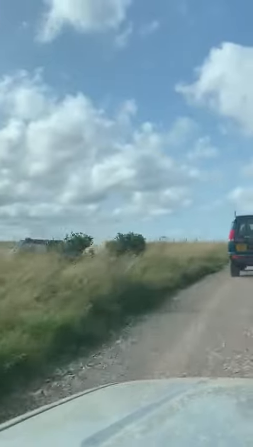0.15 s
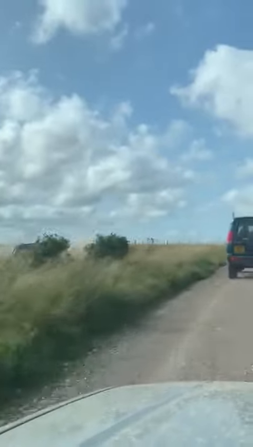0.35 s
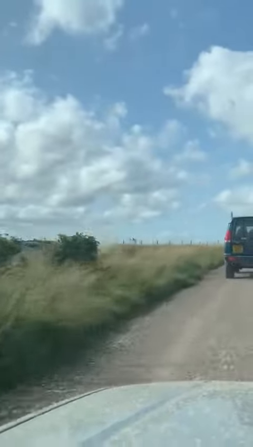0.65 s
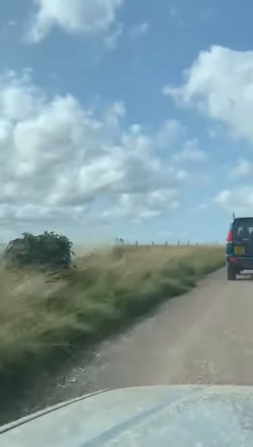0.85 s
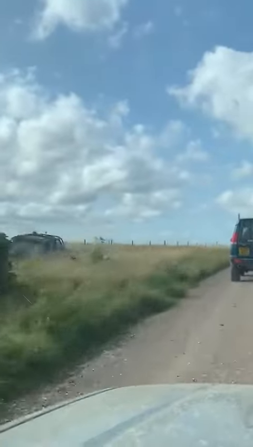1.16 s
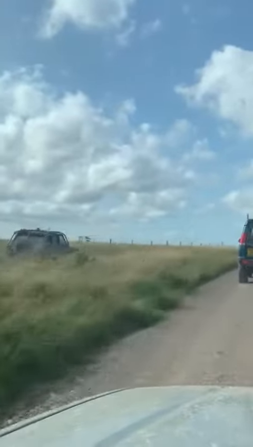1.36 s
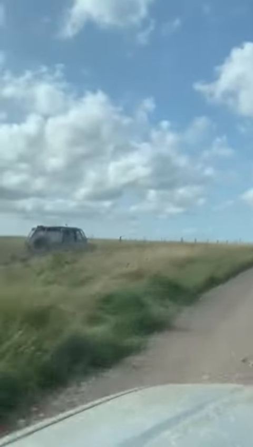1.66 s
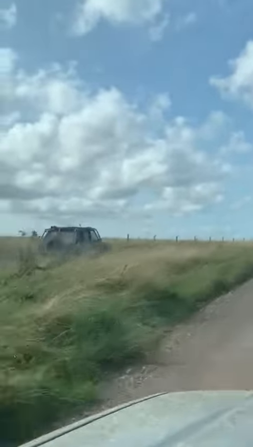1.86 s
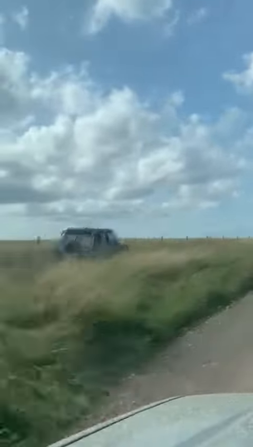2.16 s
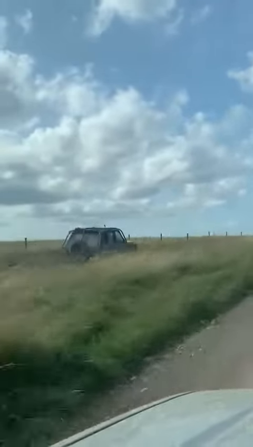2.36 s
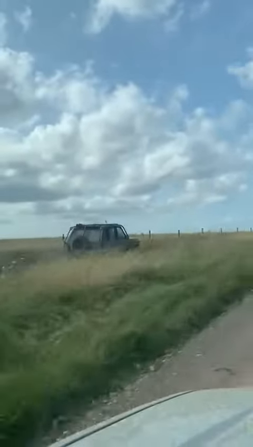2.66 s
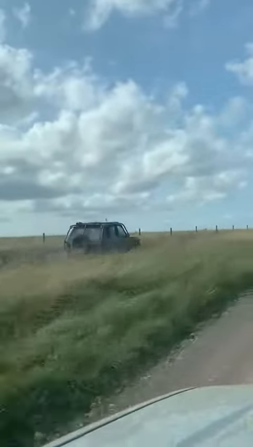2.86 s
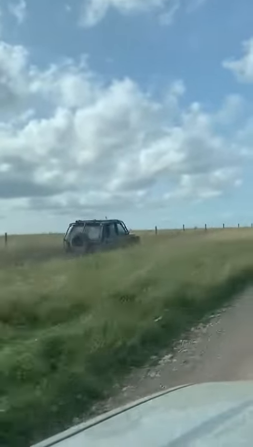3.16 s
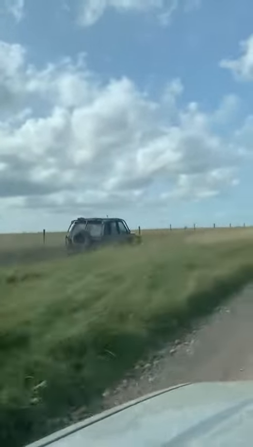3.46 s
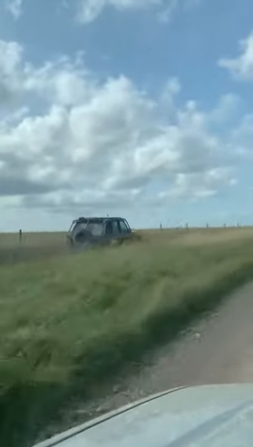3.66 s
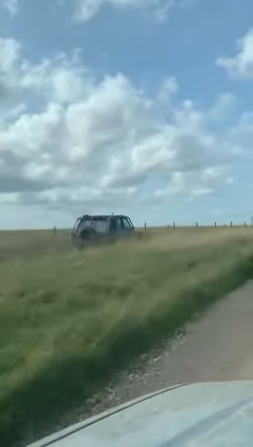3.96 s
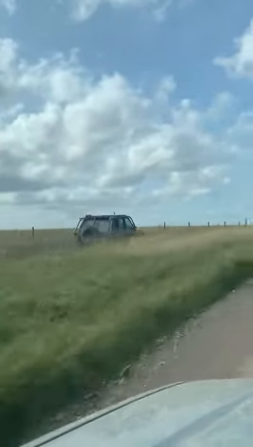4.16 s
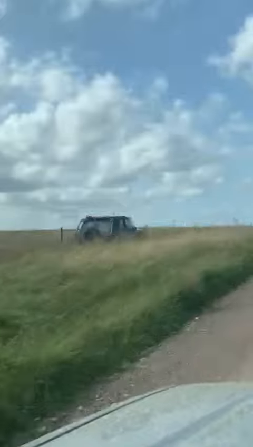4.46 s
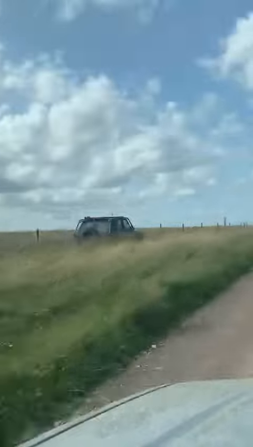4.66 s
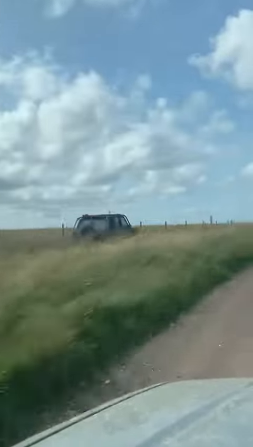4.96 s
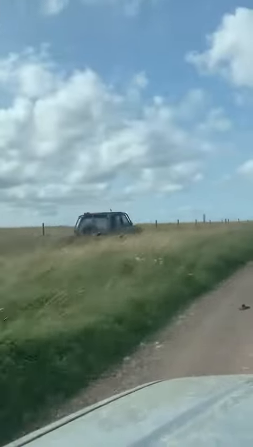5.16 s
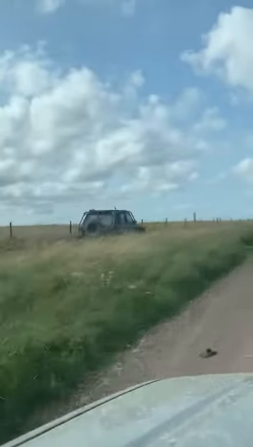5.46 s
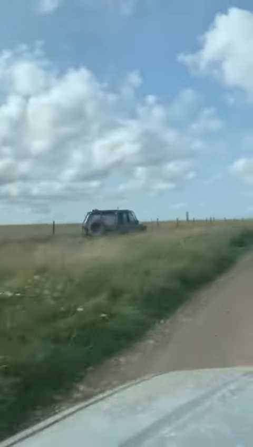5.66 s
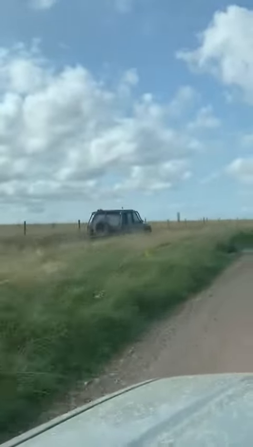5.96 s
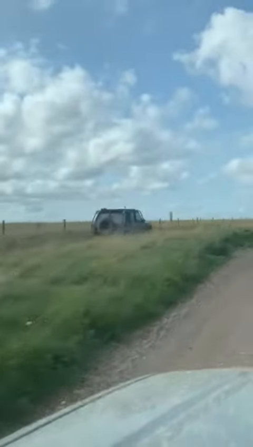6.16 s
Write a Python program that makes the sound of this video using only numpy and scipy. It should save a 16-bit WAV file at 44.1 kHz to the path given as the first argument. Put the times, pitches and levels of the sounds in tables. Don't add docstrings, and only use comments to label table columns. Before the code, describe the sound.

Heavy low wind boom fills a moving vehicle cabin, with gravel hiss, stone hits, rattles, a short engine surge, then a steady driveline hum.

```python
import sys
import numpy as np
from scipy import signal
from scipy.fft import rfft, irfft, next_fast_len
from scipy.io import wavfile
from scipy.ndimage import uniform_filter1d, minimum_filter1d

SR = 44100
rng = np.random.default_rng(int(sys.argv[2]) if len(sys.argv) > 2 else 0)


def convert_level_to_amplitude(level_db):
    exponent = np.asarray(level_db, float) / 20
    return 10 ** exponent


def unload_wav(signal):
    wavfile.write(
        sys.argv[1],
        SR,
        np.round(np.clip(np.atleast_2d(signal).T, -1, 1) * 32767).astype(np.int16),
    )


N = 278712
T = np.arange(N) / SR
BURST_T = np.arange(SR // 8) / SR


def in_time(rows):
    s, *columns = np.transpose(rows)
    return [np.interp(T, s, c) for c in columns]


def at_hz(points, hz):
    table_hz, values = np.transpose(points)
    return np.interp(np.log(hz + 1), np.log(table_hz), values)


def rms_one(x):
    return x / np.sqrt(np.mean(x ** 2) + 1e-20)


def drift(rate):
    r = np.exp(-80 * np.pi * rate / SR)
    slow = signal.lfilter([1], [1, -2 * r, r * r], rng.standard_normal(N // 40 + 2002))[2000:]
    return np.interp(np.arange(N) / 40, np.arange(len(slow)), rms_one(slow))


def resonance(x, hz, width_hz):
    r = np.exp(-np.pi * width_hz / SR)
    zeros = np.array([1, 0, -1]) * (1 - r * r) / 2
    return signal.lfilter(zeros, [1, -2 * r * np.cos(2 * np.pi * hz / SR), r * r], x + 1e-18)


def turbulence(spectrum, shared_db, own_db, rate, count):
    size = next_fast_len(N)
    hz = np.fft.rfftfreq(size, 1 / SR)
    low_hz, high_hz = spectrum[0][0], spectrum[-1][0]
    inside = (hz > low_hz) & (hz < high_hz)
    colour = rfft(rng.standard_normal(size)) * convert_level_to_amplitude(at_hz(spectrum, hz)) * inside
    place = np.interp(np.log(hz + 1), np.log([low_hz, high_hz]), [0, count - 1])
    together = shared_db * drift(rate)
    total = np.zeros(N)
    for k in range(count):
        band = irfft(colour * np.clip(1 - abs(place - k), 0, 1), size)[:N]
        total += band * convert_level_to_amplitude(together + own_db * drift(rate))
    return rms_one(total)


def evened(x, hold_s, share):
    hold = int(hold_s * SR)
    level = uniform_filter1d(uniform_filter1d(x ** 2, hold), hold)
    return rms_one(x / (level + 1e-3) ** (share / 2))


def bumps(s, height, half_s, clock):
    return sum(d * np.clip(1 - abs(clock - at) / max(h, .01), 0, 1) for at, d, h in zip(s, height, half_s))


def bursts(times, peaks_db, lengths_s, rise_s, squareness):
    for s, db, length in zip(times, peaks_db, lengths_s):
        fall = np.exp(-(BURST_T / length) ** squareness)
        yield round(s * SR), convert_level_to_amplitude(db) * np.minimum(BURST_T / rise_s, 1) * fall


def burst_noise():
    return rng.standard_normal(SR // 8)


def add(out, at, sound):
    out[at:at + len(sound)] += sound[:N - at]


# f/Hz, level/dB (per Hz)
BOOM_COLOUR = [(45, -19), (54, -9.5), (59.5, -6), (63, -9), (66.5, -6.5), (73, -7.5), (88, -15.5),
               (100, -31)]
# t/s, f/Hz
BOOM_PITCH = [(0, 60.7), (.58, 62.06), (.74, 68.17), (1.23, 69.83), (1.62, 68.3), (1.76, 61.33),
              (2.02, 60.54), (2.11, 66), (2.83, 63.54), (3.2, 61.17), (3.7, 60.93), (4.25, 59.8),
              (4.6, 60.8), (5.0, 63.45), (5.25, 59.5), (5.8, 60), (6.32, 58.3)]
# t/s, shift/Hz, half length/s
BENDS = [
    (2.48, 7, .06),
    (2.966, -7, 0.097),
    (3.471, 10.5, 0.13),
    (3.896, 8, .14),
    (4.124, -6, 0.091),
    (4.779, 14, .14),
    (6.022, 9.5, 0.078),
]
# t/s, level/dB, half length/s
SURGES = [(0.027, 6, 0.066), (0.13, 0, 0.043), (0.552, 3.5, 0.12), (0.767, -6.5, 0.08), (.9, -3, .06),
          (1.15, -1.5, 0.089), (1.45, 4.5, 0.12), (1.77, -8, 0.088), (2.087, -6.5, 0.047), (2.13, 7, 0.034),
          (2.213, -15, 0.013), (2.306, -3, 0.045), (2.422, -0.5, 0.062), (2.6, -5, 0.024),
          (2.695, 6.5, 0.053), (2.724, -18, 0.02), (2.81, 1, 0.026), (2.923, -18, 0.025),
          (3.04, -15.5, 0.052), (3.13, 3, 0.045), (3.244, 5.5, 0.11), (3.367, -1.5, 0.1),
          (3.54, 3.5, 0.078), (3.671, -10, 0.055), (3.824, 0.5, 0.089), (3.878, -1.5, 0.037),
          (3.892, -0.5, 0.052), (4.059, -7.5, 0.11), (4.19, 7, 0.12), (4.45, -1.5, .1), (4.7, -0.5, 0.09),
          (4.911, -4.5, 0.081), (5.109, -7.5, 0.11), (5.302, -2, 0.094), (5.542, -2, 0.061),
          (5.798, -3.5, 0.11), (6.044, 5.5, 0.13), (6.096, -14, 0.054), (6.214, -19, 0.032)]
# t/s, flow level/dB, turbulence level/dB
AIRFLOW = [(0, -11.5, 0.5), (.45, -9, 1.5), (.8, -10.5, 2), (1.3, -11.5, 1), (1.65, -11.5, 2.5),
           (2.1, -9.5, -2.5), (2.5, -13.5, -3), (3.0, -12, 0.5), (3.5, -12, -2.5), (4.0, -10, 0),
           (4.4, -12.5, -0.5), (4.9, -12, -2), (5.4, -9.5, -1.5), (5.8, -14, -0.5), (6.1, -13.5, 1),
           (6.32, -14.5, 0)]


def cabin_boom():
    boom = evened(turbulence(BOOM_COLOUR, 0.024, 0.36, rate=5.5, count=2), hold_s=0.054, share=0.78)
    pitch_hz = in_time(BOOM_PITCH)[0] + bumps(*np.transpose(BENDS), T)
    clock = np.cumsum(pitch_hz / 63) % (N - 1)
    boom = np.interp(clock, np.arange(N), boom)
    locked = np.sin(2 * np.pi * np.cumsum(pitch_hz * (1 + 0.015 * drift(2.77))) / SR)
    level_db = in_time(AIRFLOW)[0] + bumps(*np.transpose(SURGES), T)
    return convert_level_to_amplitude(level_db - 2.0) * rms_one(boom + 1.25 * locked)


# f/Hz, level/dB (per Hz)
RUMBLE_COLOUR = [(20, -22.5), (31, -7.5), (42, -3.5), (52, 0), (62, -8)]


def body_rumble():
    rumble = evened(turbulence(RUMBLE_COLOUR, 0.52, 0.18, rate=0.79, count=2), hold_s=0.43, share=0.27)
    return convert_level_to_amplitude(in_time(AIRFLOW)[0] - 8.5) * rumble


# f/Hz, level/dB (per Hz)
THROB_COLOUR = [(75, -8.5), (92, 1), (108, -2), (125, 2), (155, -6.5), (200, -3.5), (260, -11), (330, -13),
                (420, -44)]
# t/s, level/dB, half length/s, size (0 small - 1 large)
EDDIES = [(0, 4.5, 0.03, 0.096), (0.101, 8, 0.026, 0.15), (0.32, 2, 0.09, 0.16), (0.622, -1.5, 0.019, 0.1),
          (1.05, 0.5, 0.13, 0.61), (1.195, -1.5, 0.042, 1), (1.387, 2.5, 0.15, 0.53),
          (1.603, 3, 0.024, 0.081), (2.1, 0, 0.03, 0.18), (2.344, 1, 0.16, .05), (2.612, 1.5, 0.16, 0.61),
          (2.696, 1, 0.14, 0.26), (2.781, 2, 0.073, 0.49), (3.033, -0.5, 0.17, 0.59),
          (3.153, 1, 0.043, 0.95), (3.183, 1.5, 0.034, 0.62), (3.522, 2.5, 0.13, 0.28),
          (3.701, 5, 0.1, 0.66), (3.858, 6.5, 0.046, 0.43), (4.02, 0.5, 0.11, 0.99),
          (4.138, 4, 0.032, 0.21), (4.517, 0, 0.1, 0.84), (4.692, 4, 0.18, 0.4),
          (4.819, -0.5, 0.045, 0.044), (4.977, 5, 0.12, 0.48), (5.096, -0.5, 0.14, 0.23),
          (5.5, -2, 0.093, 0.98), (5.697, 1, 0.057, 0.8), (5.79, -1, 0.12, 0.54),
          (6.223, -2.5, 0.074, 0.46)]


def wind_throb():
    throb = evened(turbulence(THROB_COLOUR, 0.57, 0.95, rate=8.1, count=5), hold_s=0.089, share=0.6)
    s, db, half_s, size = np.transpose(EDDIES)
    last_end = PULLS[-1][1]
    pulling = np.interp(T, [PULLS[0][0], PULLS[1][0], last_end, last_end + 0.12], [0, 1, 1, 0.76])
    level_db = -17.5 + 0.42 * in_time(AIRFLOW)[1] - 3 * pulling
    return convert_level_to_amplitude(level_db + bumps(s, 2 * db * size, half_s, T)) * throb


# f/Hz, level/dB (per Hz)
BUFFET_COLOUR = [(280, -7.5), (370, 0.5), (460, 1.5), (560, -5), (800, -7), (1150, -12), (1500, -19),
                 (2000, -22), (2800, -25.5)]


def wind_buffeting():
    rough_db = in_time(AIRFLOW)[1]
    buffet = evened(turbulence(BUFFET_COLOUR, 0.47, 2.81, rate=11.9, count=7), hold_s=0.15, share=0.74)
    edge = signal.sosfilt(signal.butter(2, 1400, "high", fs=SR, output="sos"), buffet)
    buffet = buffet + convert_level_to_amplitude(-6 + 2.5 * rough_db) * edge
    s, db, half_s, size = np.transpose(EDDIES)
    return convert_level_to_amplitude(-31 + 1.24 * rough_db + bumps(s, 2 * db * (1 - size), half_s, T)) * buffet


# f/Hz, level/dB (per Hz)
HISS_COLOUR = [(1500, -5.5), (2300, 1.5), (3300, 6.5), (4700, 2.5), (6300, -1.5), (8500, -4.5),
               (11500, -10.5), (11850, -13.5)]
# t/s, level/dB
TYRES = [(0, -62.5), (.1, -63.5), (.25, -63.5), (1.2, -65.5), (1.5, -60), (1.79, -64), (2.2, -66),
         (2.5, -65.5), (2.8, -64.5), (3.05, -67), (3.22, -66.5), (4.07, -66), (4.17, -68), (6.32, -69.5)]


def tyre_hiss():
    hiss = turbulence(HISS_COLOUR, 0.7, 1.6, rate=16.0, count=8)
    grains = rng.random(N) < 60 / SR
    grit = grains * convert_level_to_amplitude(4.0 * np.minimum(rng.exponential(1, N), 2))
    crackle = 1 + 0.73 * signal.lfilter([1], [1, -.985], grit)
    return convert_level_to_amplitude(in_time(TYRES)[0] + 18.5) * hiss * rms_one(crackle)


# t/s, peak level/dB, f/Hz
TICKS = [(0.058, -31.5, 6364), (0.395, -26, 3010), (0.4823, -46, 6400), (0.5863, -40.5, 6500),
         (0.835, -31.5, 6390), (.915, -35.5, 3180), (0.9668, -37.5, 6500), (1.052, -43, 6600),
         (1.2824, -41, 6400), (1.515, -35, 6300), (1.571, -37, 6400), (2.396, -36, 5600),
         (2.468, -39, 5840), (2.502, -44, 6560), (2.538, -42, 7160), (2.722, -34, 5560),
         (2.732, -31.5, 5600), (2.99, -34.5, 6000), (3.079, -39, 5500), (3.175, -40, 6060),
         (3.653, -43, 6058), (3.681, -35, 6050), (3.739, -39, 6200), (3.847, -53, 5930), (3.909, -35, 6020),
         (3.938, -41, 6600), (3.966, -40, 6572), (4.022, -44, 6390), (4.313, -46, 6980), (4.639, -44, 6400),
         (4.76, -48.5, 6700), (5.323, -44, 6510), (5.646, -44, 6290), (5.782, -53, 6280),
         (5.865, -50, 5996)]


def trim_ticks():
    out = np.zeros(N)
    s, db, tick_hz = np.transpose(TICKS)
    for hz, (at, shape) in zip(tick_hz, bursts(s, db, [.004] * len(s), 0.00074, 0.41)):
        ring = resonance(resonance(shape * burst_noise(), hz, 430), hz, 1300)
        add(out, at, convert_level_to_amplitude(17.0) * ring)
    return out


# t/s, peak level/dB, f/Hz
KNOCKS = [(0.085, -12, 407), (0.228, -15.5, 470), (0.258, -7, 406), (.307, -11, 378), (0.596, -9, 416),
          (0.637, -7.5, 472), (.701, -8.5, 418), (0.759, -7, 353), (.931, -10, 358), (1.085, -9.5, 743.6),
          (1.326, -16, 455), (1.39, -11.5, 376), (1.655, -26, 1290), (2.028, -15, 364), (2.101, -18.5, 350),
          (2.222, -24, 467), (2.589, -16, 362), (2.698, -17, 685), (3.324, -26.5, 560),
          (3.591, -19.5, 397.4), (3.846, -14.5, 486), (3.918, -16, 590), (4.114, -17.5, 450),
          (4.349, -14.5, 380), (4.688, -13, 521), (4.831, -23.5, 470), (4.959, -15.5, 434),
          (5.391, -12, 370), (5.99, -15, 470), (6.103, -16, 724.4), (6.185, -16, 495)]


def panel_knocks():
    out = np.zeros(N)
    s, db, panel_hz = np.transpose(KNOCKS)
    for hz, (at, shape) in zip(panel_hz, bursts(s, db - 15.5, [.02] * len(s), .0015, 0.81)):
        noise = burst_noise()
        tone = np.sin(2 * np.pi * hz * BURST_T)
        rough = rms_one(resonance(resonance(noise, hz, 0.5 * hz), 1.5 * hz, 1100))
        crack = rms_one(resonance(resonance(noise[::-1], 900, 980), 980, 1800)) * np.exp(-BURST_T / .005)
        add(out, at, shape * (1.88 * tone + 0.99 * rough + 0.58 * crack))
    return out


# t/s, peak level/dB, length/s, dulling/(dB per octave), lowest f/Hz
STONES = [(0.095, -24, 0.01, -7.5, 890), (0.141, -29, 0.017, -1.5, 3960), (0.231, -27, 0.016, -11.5, 910),
          (0.391, -17.5, 0.024, -6.5, 2700), (1.455, -29.5, 0.0098, -4, 1540),
          (1.6504, -23, 0.022, -2.5, 2530), (1.655, -14.5, 0.02, -9, 693), (1.673, -33.5, 0.053, -6, 2972),
          (2.1, -20, 0.0069, -19, 2220), (2.42, -45, 0.0059, -23, 902.4), (2.497, -24.5, 0.012, -12, 2220),
          (2.781, -20, 0.012, -9, 3400), (3.403, -32.5, 0.029, -7.5, 2000), (3.852, -28, 0.008, -22, 899),
          (4.686, -28.5, 0.026, -12, 900), (4.803, -37, 0.012, -4, 4000), (4.953, -37.5, 0.028, -9, 897)]


def stone_sprays():
    out = np.zeros(N)
    s, db, length_s, dulling_db, low_hz = np.transpose(STONES)
    hz = np.fft.rfftfreq(SR // 8, 1 / SR)
    for k, (at, shape) in enumerate(bursts(s, db - 4, np.clip(length_s, .003, .05), .0006, 2.5)):
        tilt = convert_level_to_amplitude(dulling_db[k] * np.log2(hz / 4000 + 0.29))
        tilt = tilt / (1 + (low_hz[k] / (hz + 1)) ** 8)
        add(out, at, shape * irfft(rfft(burst_noise()) * tilt, SR // 8))
    return out


# t/s, peak level/dB
SQUEAKS = [(0.14, -30), (0.688, -38), (0.823, -48), (0.99, -38), (1.087, -33), (1.144, -34), (1.324, -27.5),
           (1.589, -49), (4.831, -45), (5.503, -33.5), (5.555, -37), (5.615, -40), (6.15, -39)]


def trim_squeaks():
    out = np.zeros(N)
    for at, shape in bursts(*np.transpose(SQUEAKS), [.011] * len(SQUEAKS), 0.00027, 1.0):
        hz = 4720 + 30 * rng.standard_normal()
        add(out, at, shape * np.sin(2 * np.pi * hz * BURST_T))
    return out


# t/s, level/dB, half length/s
FITS = [(0.75, 5, 0.083), (1.18, 15, 0.06), (2.308, 10.5, 0.052), (2.425, 12, 0.064), (2.512, 17, 0.078),
        (2.613, 13, 0.074), (2.8, 16, 0.12), (2.915, 10, 0.075), (3.003, 15, 0.083), (3.174, 11, 0.11),
        (3.297, 9.5, 0.1), (3.558, 17.5, 0.083), (3.693, 17.5, 0.14), (3.85, 12, 0.046),
        (3.944, 18.5, 0.11), (4.398, -2.5, 0.059), (4.685, 4, 0.076), (4.941, 15.5, 0.036)]
# f/Hz, level/dB, t60/s
DASH = [(2427, -3.5, 0.076), (2752, 2, 0.042), (3080, -5, 0.049), (3154, 0.5, 0.065), (3300, 4.5, .04),
        (3575, 1.5, .06), (4060, -1.5, 0.042), (4290, -3, 0.042), (4540, -3, 0.057), (4650, 2, 0.033),
        (5230, -2, 0.02), (5240, 0.5, .04), (5980, -2, 0.044), (6900, -8, 0.017)]


def dashboard_chatter():
    clicks = rng.random(N) < 280 / SR
    clicks = clicks * convert_level_to_amplitude(-68 + bumps(*np.transpose(FITS), T))
    out = np.zeros(N)
    for hz, db, t60 in DASH:
        mode = resonance(clicks * rng.standard_normal(N), hz, 2.2 / t60)
        out += convert_level_to_amplitude(db) * mode * SR * t60 / 7
    return out


# t/s, peak level/dB
FLICKS = [
    (1.841, -21.5),
    (1.88, -31),
    (2.101, -27),
    (2.427, -22),
    (2.484, -34),
    (2.908, -25),
    (3.412, -26),
    (6.075, -39),
]


def draught_flicks():
    out = np.zeros(N)
    for at, shape in bursts(*np.transpose(FLICKS), [.004] * len(FLICKS), 0.001, 2.5):
        puff = resonance(resonance(burst_noise(), 550, 900), 600, 2700)
        add(out, at, shape * rms_one(puff))
    return signal.sosfilt(signal.butter(4, 5000, fs=SR, output="sos"), out)


# t/s, third multiple of the firing rate f/Hz
REVS = [
    (2.1, 174),
    (2.52, 178),
    (2.8, 189),
    (3.18, 198),
    (3.5, 205),
    (3.9, 214),
    (4.12, 210),
]


def crank_turns():
    return np.cumsum(in_time(REVS)[0]) / 6 / SR


# start t/s, end t/s, drone level/dB and clatter level/dB at the start
PULLS = [
    (2.14, 2.5, -23.5, -54.5),
    (2.52, 3.19, -20.5, -49.5),
    (3.5, 4.02, -24.5, -48),
]


def throttle(levels_db, gain_db_per_s):
    levels = []
    for (start, end, *_), db in zip(PULLS, levels_db):
        held = np.clip(T, start, end)
        levels.append(db + gain_db_per_s * (held - start) - 157 * abs(T - held))
    return np.max(levels, axis=0)


# multiple of crank speed, level/dB
ORDERS = [(1, -5.5), (2, -3.5), (4, -11.5), (6, 0.5), (7, -24.5)]
# t/s, level/dB
FIFTH = [(3.5, -32), (3.65, -25), (3.85, -21.5), (4.02, -21.5), (4.1, -39)]


def engine_drone(crank):
    drone = np.zeros(N)
    for k, db in ORDERS:
        drone += convert_level_to_amplitude(db + 1.0 * drift(1.5)) * np.sin(2 * np.pi * int(k) * crank + k)
    fifth = convert_level_to_amplitude(in_time(FIFTH)[0]) * np.sin(10 * np.pi * crank)
    level_db = throttle(np.transpose(PULLS)[2], 0.5)
    return 1.14 * (convert_level_to_amplitude(level_db) * drone + fifth)


# f/Hz, width/Hz, level/dB
BLOCK = [(2510, 230, -6), (2980, 340, -14), (3370, 500, 15), (3600, 360, 19), (3930, 68, 28),
         (4150, 210, 10), (5220, 470, 9.5), (5270, 1800, -3.5), (7350, 1100, -23)]


def engine_clatter(crank):
    alternate_db = 2.3 * np.sign(crank % 1 - .5)
    gate = .5 + np.exp(-4.0 * (2 * crank % 1)) * convert_level_to_amplitude(alternate_db + 2.0 * drift(7.3))
    noise = rng.standard_normal(N) * gate
    clatter = rms_one(sum(convert_level_to_amplitude(db) * resonance(noise, hz, width) for hz, width, db in BLOCK))
    return convert_level_to_amplitude(throttle(np.transpose(PULLS)[3], 4.5)) * clatter


def engine():
    crank = crank_turns()
    pulling = abs(T - 3.06) < 1.06
    return pulling * (engine_drone(crank) + engine_clatter(crank))


# t/s, f/Hz, level/dB
CRUISE = [(4.0, 100.9, -32), (4.2, 102.5, -28.5), (4.53, 104, -21.5), (4.8, 106.1, -24.5), (5.1, 108, -21),
          (5.7, 108.2, -21.5), (6.25, 108.1, -20.5)]


def driveline_hum():
    hum_hz, hum_db = in_time(CRUISE)
    return convert_level_to_amplitude(hum_db + 5.0) * np.sin(2 * np.pi * np.cumsum(hum_hz) / SR) * (T > CRUISE[0][0])


# f/Hz, phase spread/rad
SCATTER = [(40, 0.29), (62, 0.2), (90, 1.0), (130, 0.31), (220, .25), (400, 0.68), (500, 2.2), (1200, 3.0),
           (4000, 2.5), (9000, 16)]


def scene():
    airborne = cabin_boom() + body_rumble() + wind_throb() + wind_buffeting() + tyre_hiss()
    contacts = trim_ticks() + panel_knocks() + stone_sprays() + trim_squeaks() + dashboard_chatter()
    contacts = contacts + engine() + driveline_hum()
    padded = np.pad([airborne, contacts], [(0, 0), (0, 2048)], mode="reflect")
    hz, s, (steady, sudden) = signal.stft(padded, SR, nperseg=1024)
    spread = at_hz(SCATTER, hz)
    unsettled = 1 + (2.2 - 1) * np.outer(hz < 450, s < WIDENING[0][0])
    stirred = spread[:, None] * unsettled * rng.standard_normal(steady.shape)
    wander = np.cumsum(rng.normal(0, .8, len(hz)) * (hz > 400))[:, None]
    made_up = convert_level_to_amplitude(3.2 * np.clip(spread / 2, 0, 1))[:, None]
    scattered = steady * made_up * np.exp(1j * stirred) + sudden * np.exp(1j * wander)
    return np.array([airborne + contacts, signal.istft(scattered, SR, nperseg=1024)[1][:N]])


# f/Hz, level/dB
NARROW = [(30, -25.5), (63, -24), (110, -34.5), (200, -40.5), (300, -72), (470, -9.5), (800, 0),
          (1500, -18), (2000, -2.5), (2500, 11), (2900, 0), (3300, 2.5), (4200, -4)]
# f/Hz, level/dB
WIDE = [(30, -6.5), (47, -7), (63, -14.5), (80, -14), (110, -17.5), (130, -7.5), (160, -0.5), (200, 2.5),
        (250, 9), (272, 19.5), (290, 30), (315, 18.5), (345, 5.5), (410, 0), (480, -5.5), (1400, 2),
        (1900, 4), (2300, 10), (3100, 1.5), (4200, 1)]
# f/Hz, phase/rad
NARROW_TURN = [(50, 5.5), (110, 4.7), (200, 4.3), (300, 4.0), (500, 3.6), (800, 2.2)]
# f/Hz, phase/rad
WIDE_TURN = [(40, 1.55), (62, 1.85), (92, 3.2), (110, 4.1), (180, 4.6), (270, 4.5), (300, 1.7), (420, 1.5),
             (620, 3.5), (800, 2.2)]
# t/s, share wide
WIDENING = [(2.35, 0.63), (2.65, 0.9), (3.3, 0.98), (5.6, 1)]
# t/s, f/Hz
MONO_BELOW = [(.08, 340), (.15, 330), (.4, 216), (.8, 187), (1.2, 42), (1.45, 13)]
# f/Hz, share
LEFT_BIAS = [(300, 0.03), (500, .03), (1200, -.18), (2500, -.22), (4000, .01), (8000, .1)]
# t/s, level/dB, half length/s
STARVED = [
    (2.105, 17, .05),
    (2.16, 15, .05),
    (2.215, 22, .04),
    (2.458, 60, 0.045),
    (4.49, 19, 0.04),
]
STARVED_MOST_DB = 25


def port_image(dry):
    driven = 1.127 * np.tanh(dry / 0.98)
    padded = np.pad(driven, [(0, 0), (0, 4096)], mode="reflect")
    hz, s, (direct, scattered) = signal.stft(padded, SR, nperseg=2048)
    wide = np.clip(np.interp(s, *np.transpose(WIDENING)), 0, 1)
    lean_db = np.outer(at_hz(NARROW, hz), 1 - wide) + np.outer(at_hz(WIDE, hz), wide)
    lean = np.arctan(convert_level_to_amplitude(lean_db))
    turned = np.interp(s, [WIDENING[0][0], WIDENING[1][0]], [0, 1])
    turn = np.outer(at_hz(NARROW_TURN, hz), 1 - turned) + np.outer(at_hz(WIDE_TURN, hz), turned)
    scattered = scattered * np.exp(1j * turn)
    comb = np.arctan(abs(np.tan(np.pi * (hz - 7200) / 4700)))
    treble = np.clip((hz - 4150) / 500, 0, 1)[:, None]
    lean = lean * (1 - treble) + np.clip(comb, .08, 1.3)[:, None] * treble
    lull = np.clip(bumps(*np.transpose(STARVED), s) / STARVED_MOST_DB * 2, 0, 1)
    lean = lean + .6 * (np.pi / 2 - lean) * np.outer((hz > 1080) & (hz < 2100), lull)
    mono_hz = np.interp(s, *np.transpose(MONO_BELOW))
    opened = np.clip((hz[:, None] / mono_hz - .85) * 4, 0, 1) ** 2
    mid = direct * np.cos(lean)
    side = (scattered * np.sin(lean) + mid * at_hz(LEFT_BIAS, hz)[:, None]) * opened
    both = np.array([mid, side]) * (hz < 12200)[:, None]
    return signal.istft(both, SR, nperseg=2048)[1][:, :N]


# f/Hz, level/dB (signal over step)
RESOLUTION = [(400, 50), (900, 24), (1400, 14), (2600, 12), (4700, 9), (6900, 4), (9600, 0), (11000, -2)]


def mid_side_rounding(pair):
    frame, grid, band = 1024, 907, 16
    n, k = np.arange(2 * frame), np.arange(frame)
    window = signal.windows.kaiser_bessel_derived(2 * frame, 4 * np.pi)
    basis = np.cos(np.pi / frame * np.outer(n + .5 + frame / 2, k + .5))
    basis = basis * window[:, None] * np.sqrt(2 / frame)
    padded = np.pad(pair, [(0, 0), (2 * frame - grid, 3 * frame)], mode="reflect")
    blocks = padded[:, :padded.shape[1] // frame * frame].reshape(2, -1, frame)
    lines = np.concatenate([blocks[:, :-1], blocks[:, 1:]], axis=2) @ basis
    power = (lines ** 2).sum(axis=0).reshape(-1, frame // band, band).mean(axis=2)
    mood = uniform_filter1d(rng.standard_normal((2, *power.shape)), size=3, axis=1)
    hz = (np.arange(frame // band) + .5) * SR / 128
    s = (np.arange(len(power)) * frame + grid - frame) / SR
    starved_db = np.minimum(bumps(*np.transpose(STARVED), s), STARVED_MOST_DB)[:, None]
    starved_db = starved_db * (1. * (hz > 980) - .4 * (hz > 1450) - .3 * (hz > 1950)) * (hz < 2300)
    mid_db = 11 * (hz > 1950) - 2 * (hz > 3000) + 4 * (hz > 4600) - 3 * (hz > 5200)
    mid_db = (mid_db + starved_db) * (hz < 5600) + 9 * (hz > 8700) * (hz < 10700)
    side_db = 0 * mid_db + 3 * (hz > 5600) + 4 * (hz > 6300) - 9 * (hz > 8200)
    step_db = 8 * mood - at_hz(RESOLUTION, hz) + np.array([mid_db, side_db]) + 3
    power = uniform_filter1d(minimum_filter1d(power, size=3, axis=0), size=3, axis=1)
    step = np.repeat(np.sqrt(power) * convert_level_to_amplitude(step_db) + 1e-12, band, axis=2)
    halves = (np.sign(lines) * np.floor(abs(lines) / step + .4054) * step) @ basis.T
    joined = halves[:, :-1, frame:] + halves[:, 1:, :frame]
    return joined.reshape(2, -1)[:, frame - grid:][:, :N]


def top_cut(x):
    return signal.sosfilt(signal.butter(12, 12970, fs=SR, output="sos"), x)


def record(dry):
    mid, side = port_image(dry)
    side = side + draught_flicks()
    stereo = np.array([mid + side, mid - side])
    left, right = stereo / (1 + (stereo / .97) ** 8) ** .125
    mid, side = mid_side_rounding(np.array([left + right, left - right]) / 2)
    return top_cut(np.array([mid + side, mid - side]))


dry = scene()
out = record(dry)
unload_wav(out)
```